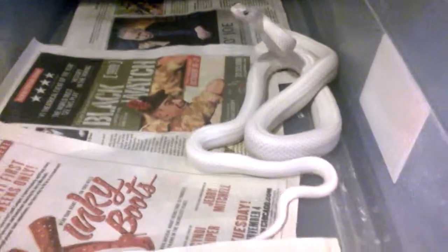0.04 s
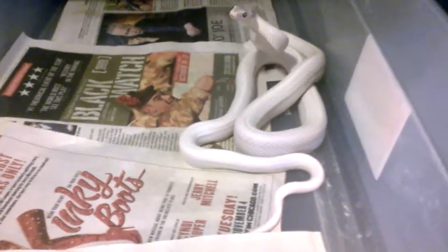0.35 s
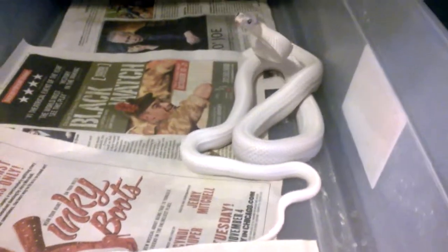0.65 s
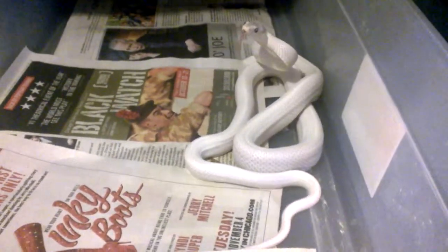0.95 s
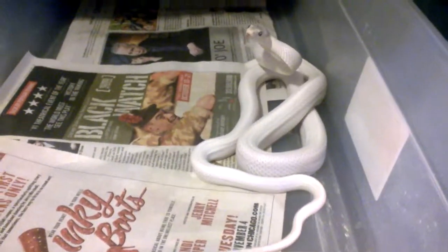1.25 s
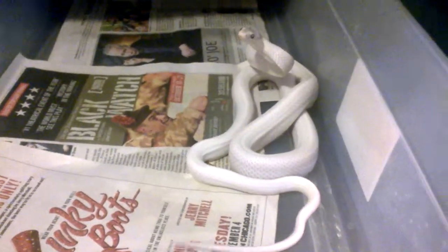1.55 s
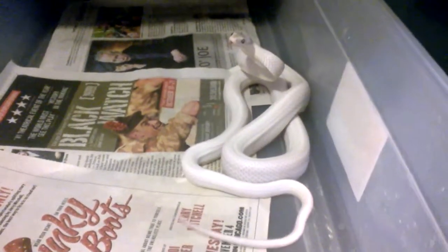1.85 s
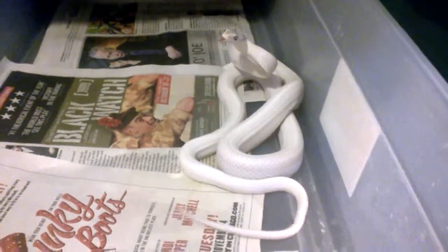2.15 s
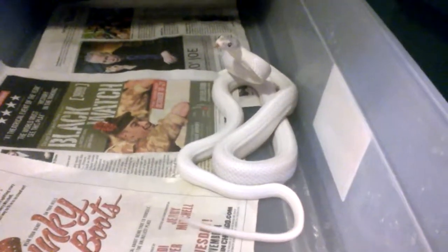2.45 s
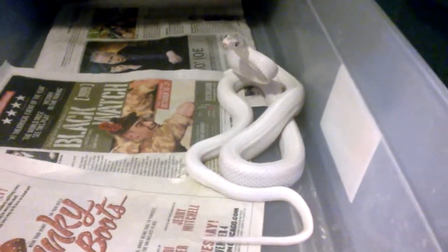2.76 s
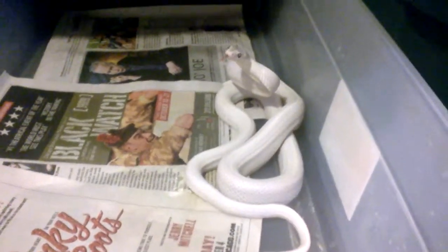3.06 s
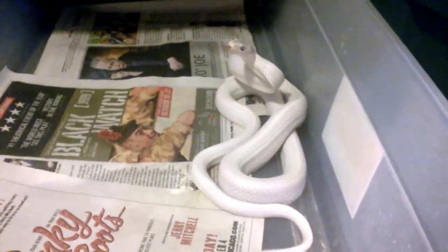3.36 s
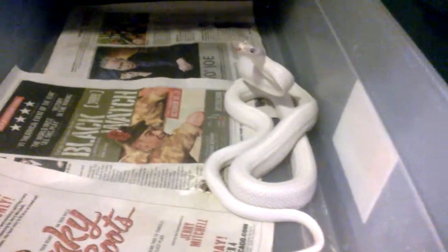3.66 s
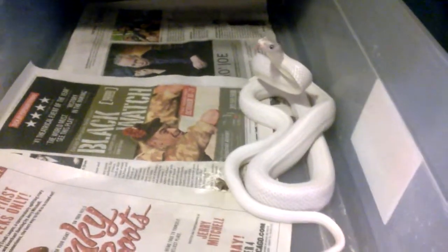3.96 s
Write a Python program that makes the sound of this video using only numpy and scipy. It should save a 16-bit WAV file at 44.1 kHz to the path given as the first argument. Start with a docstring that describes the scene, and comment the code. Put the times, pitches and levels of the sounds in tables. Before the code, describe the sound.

A snake's tail vibrates against newspaper in a plastic tub, making a continuous buzzing rustle.

```python
"""A plastic tub lined with newspaper, in a quiet room: a snake shakes its tail tip, some 44 swings a second.
Every swing scrapes the paper out and back in a spray of tiny ticks, and the rustle darkens as the tip
wanders over the sheet. The tub floor drums faintly under the tail, the body slides over the paper and
the shifting coils bump the tub. The room rumbles low behind it all."""
import sys
import numpy as np
from scipy import signal
from scipy.fft import rfft, irfft
from scipy.io import wavfile

SR = 44100
rng = np.random.default_rng(int(sys.argv[2]) if len(sys.argv) > 2 else 0)


def transcribe(u):
    """Save the signal u as a 16-bit wav file named by the first command-line argument.

    u: samples, shape (n,) or (channels, n), limited to [-1, 1]; the rate is SR.
    q: integer samples, one column per channel.
    """
    v = np.clip(np.atleast_2d(u).T, -1, 1)
    q = np.round(v * 32767).astype(np.int16)
    wavfile.write(sys.argv[1], SR, q)


N = 176400

# the out and back strokes of the tail, then the rebound of each: phase/swings, width/swings, level/dB
STROKES = [(.21, .075, 0), (.72, .095, -1.5), (.46, .03, -6.5), (.96, .035, -2.5)]


def amp(db):
    """Decibels to gain."""
    return 10 ** (np.asarray(db) / 20)


def unit(x):
    """Scales a signal to rms 1."""
    return x / np.sqrt(np.mean(x ** 2) + 1e-20)


def curve(points):
    """An automation curve through (time, value) points, one value a sample."""
    return np.interp(np.arange(N) / SR, *np.transpose(points))


def swell(peak_s, rise_s, fall_s):
    """A bell-shaped envelope with its own rise and fall times."""
    t = np.arange(N) / SR - peak_s
    return np.exp(-.5 * (t / np.where(t < 0, rise_s, fall_s)) ** 2)


def colour(x, points):
    """A minimum-phase EQ through (frequency, level) points; the result has rms 1."""
    hz, db = np.transpose(points)
    f = abs(np.fft.fftfreq(8192, 1 / SR))
    gain_db = np.interp(np.log(f + 1), np.log(hz + 1), db)
    log_gain = np.log(amp(np.maximum(gain_db, -100)))
    ring = np.fft.ifft(np.exp(np.conj(signal.hilbert(log_gain)))).real
    return unit(signal.oaconvolve(x, ring[:len(ring) // 2])[:N])


def tail_pressure(swings, drag_db=-9.5, spread_db=.5, jitter_swings=.022, slap_s=.001):
    """The tip presses on the paper: two uneven strokes a swing over a light drag, and the odd slap."""
    # hard slaps of the tip: t/s, level/dB against a plain stroke
    slaps = [(.304, -1), (.382, 0), (1.423, 5), (3.76, 1), (3.824, 1), (3.99, 1)]
    swing_index, power = swings.astype(int), amp(drag_db) ** 2
    for phase, width, db in STROKES:
        late, strength = rng.standard_normal((2, SR))[:, swing_index]
        away = (swings % 1 - phase - jitter_swings * late) / width
        power = power + amp(db + spread_db * strength) ** 2 * np.exp(-.5 * away ** 2)
    for at, db in slaps:
        power = power + amp(db) ** 2 * swell(at, slap_s, slap_s)
    return np.sqrt(power)


def friction(pressure, slip_s=.002, slip_db=2.5, shared=.02, ticks_per_s=1400, scrape_over_ticks_db=7.5):
    """Scales catch and slip on paper fibres: a scrape of brief spurts, band by band, and hard ticks."""
    # centres of the bands that slip almost independently: f/Hz
    bands = [2500, 4200, 5400, 6500, 8200, 11000, 14500]
    window = np.exp(-np.pi * (2 * np.arange(-200, 201) / (slip_s * SR)) ** 2)
    noises = rng.standard_normal((len(bands) + 1, N))
    common_slip, *band_slips = [unit(signal.oaconvolve(noise, window, "same")) for noise in noises]
    hz, scrape = np.fft.rfftfreq(N, 1 / SR), 0
    for own_slip, band in zip(band_slips, np.eye(len(bands))):
        hiss = irfft(rfft(rng.standard_normal(N)) * np.sqrt(np.interp(hz, bands, band)), N)
        slip = np.sqrt(shared) * common_slip + np.sqrt(1 - shared) * own_slip
        scrape = scrape + hiss * amp(slip_db * np.minimum(slip, 2))
    tick_size = amp(2 * np.minimum(rng.exponential(1, N), 3))  # spread over 6 dB
    ticks = tick_size * rng.choice([-1, 1], N) * (rng.random(N) < ticks_per_s / SR)
    return unit(pressure * (amp(scrape_over_ticks_db) * unit(scrape) + unit(ticks)))


def tub_walls(x, count=40, wet_db=-9.5, t60_s=.04, spot_s=.5):
    """Close reflections between the tub walls, crossfading as the tip moves from spot to spot."""
    spot, echoes = np.arange(N) / SR / spot_s, 0
    for k in range(int(spot[-1]) + 2):
        delay_s = rng.uniform(.0005, .03, count)
        taps = np.zeros(SR // 20)
        taps[(delay_s * SR).astype(int)] = rng.choice([-1, 1], count) * amp(-60 * delay_s / t60_s)
        near = np.sqrt(np.maximum(1 - abs(spot - k), 0))
        echoes = echoes + near * signal.oaconvolve(x, taps / np.linalg.norm(taps))[:N]
    return unit(x + amp(wet_db) * echoes)


def paper_rustle(scrape, place, trim_db=.52):
    """Friction rings the sheet, in a different tone at each place the tip touches."""
    # the paper's resonances at each place: f/Hz, level/dB
    edge = [(530, -71), (900, -30.5), (2550, -23.5), (2950, -13.5), (3750, -1), (5250, -2.5), (6100, -8),
            (6600, -3), (8100, -1), (9100, -4.5), (9870, -13), (12000, -10.5), (15600, -39)]
    along_edge = [(530, -66), (900, -35.5), (1710, -34), (2550, -26.5), (4020, -6.5), (5500, -4),
                  (6260, -11), (6680, -5), (8040, -1), (10400, -18.5), (12000, -21.5), (15600, -37)]
    middle = [(530, -63), (900, -41), (1840, -34), (3030, -22.5), (3340, -13), (4520, -3), (5560, -4.5),
              (6300, -0.5), (7060, -5), (8390, -6.5), (12000, -16.5), (15600, -55)]
    fold = [(530, -68), (900, -39), (1600, -40.5), (3450, -16), (4200, -.5), (6470, -4), (6980, -9),
            (7950, -7), (12000, -20.5), (15600, -53)]
    flap = [(530, -87), (900, -50), (1880, -33.5), (2350, -35), (4000, -3.5), (4400, 0.5), (5050, -8.5),
            (6400, -12), (7100, -18.5), (8210, -16), (12000, -24.5), (15600, -56)]
    # fader ride of the rustle, ahead of the trim: t/s, level/dB
    fader = [(0, -44), (1.56, -46.5), (1.59, -44.5), (3.21, -42), (3.56, -41), (3.86, -41), (4, -42)]
    rustle = 0
    for k, spectrum in enumerate([edge, along_edge, middle, fold, flap]):
        share = np.maximum(1 - abs(place - k), 0)
        rustle = rustle + share * colour(scrape, spectrum)
    return flap_lift(rustle) * amp(curve(fader) + trim_db)


def scale_fizz(pressure, place, trim_db=-1.5):
    """The scales add a fine fizz on top; its tone changes from the middle of the sheet to the fold."""
    # the fizz from edge to middle, and on fold and flap: f/Hz, level/dB
    sheet_eq = [(7000, -44.5), (9500, -12), (10600, -0.5), (12000, -1), (13500, 1), (15700, -2)]
    flap_eq = [(7000, -44), (9500, -3), (11500, -14), (13300, 3.5), (14600, -0.5), (15700, 2.5)]
    # fader ride of the fizz, ahead of the trim: t/s, level/dB
    fader = [(0, -45.5), (.3, -53), (.42, -48.5), (.75, -52.5), (.92, -60), (1.08, -54), (1.25, -69),
             (1.42, -55.5), (1.57, -57), (1.62, -52.5), (1.9, -48), (2.1, -51.5), (2.9, -50), (3.15, -47),
             (3.83, -47.5), (3.92, -52), (4, -55.5)]
    scrape = tub_walls(friction(pressure))
    blend = np.clip(place - 2, 0, 1)
    fizz = (1 - blend) * colour(scrape, sheet_eq) + blend * colour(scrape, flap_eq)
    return fizz * amp(curve(fader) + trim_db)


def tub_drumming(swings, return_db=-6, spread_db=2, scuff_db=-2):
    """Each stroke taps and scuffs the tub floor through the paper, the return stroke more softly."""
    # resonances of the tub floor: f/Hz, level/dB
    floor_eq = [(40, -1.5), (90, 0), (130, 0), (195, 2), (265, -7), (315, 0), (370, 2.5), (480, -5),
                (900, -13.5), (4000, -49)]
    # fader ride of the drumming: t/s, level/dB
    fader = [(0, -77.5), (.5, -68), (1.2, -74.5), (2.6, -81), (3, -73.5), (3.4, -77.5), (3.8, -77)]
    taps = np.zeros(N)
    for (phase, _, _), db in zip(STROKES, [0, return_db]):
        hits = np.flatnonzero(np.diff(np.floor(swings - phase)))
        taps[hits] += amp(db + spread_db * rng.standard_normal(SR)[:len(hits)])
    scuff = unit(tail_pressure(swings) * rng.standard_normal(N))
    return colour(unit(taps) + amp(scuff_db) * scuff, floor_eq) * amp(curve(fader))


def room_tone(level_db=-63.5, rumble_below_hz=150, lumps_db=1.9, lumps_hz=9):
    """A faint hiss over a rumble that comes in lumps."""
    # the room's noise floor: f/Hz, level/dB
    room_eq = [(20, -15), (42, 1), (60, -3.5), (85, -4.5), (130, -11), (250, -19), (500, -29), (1000, -31),
               (4000, -32)]
    bed = colour(rng.standard_normal(N), room_eq)
    rumble = signal.sosfiltfilt(signal.butter(2, rumble_below_hz, fs=SR, output="sos"), bed)
    hiss = bed - rumble
    smoothing = np.exp(-(np.fft.rfftfreq(N, 1 / SR) / lumps_hz) ** 2)
    lumps = unit(irfft(rfft(rng.standard_normal(N)) * smoothing, N))
    return amp(level_db) * (hiss + rumble * unit(amp(lumps_db * lumps)))


def body_slides(pressure, stop_s=.028):
    """The body slides over the paper: soft rubs that swell and stop short, shaken by the tail."""
    # the slides: peak t/s, rise/s, level/dB, f/Hz
    slides = [(.33, .14, -69, 353), (.7, 0.14, -63.5, 345), (1.66, 0.056, -71, 288),
              (2.91, 0.057, -69, 1730), (3.72, .07, -71.5, 345)]
    # tone of a rub: multiple of the slide's f, level/dB
    rub_eq = [(.2, -20), (.75, -4), (1.15, 1.5), (2.2, -14), (8, -52)]
    out = np.zeros(N)
    for peak_s, rise_s, db, hz in slides:
        rub = colour(pressure * rng.standard_normal(N), [(hz * k, level) for k, level in rub_eq])
        out += amp(db) * rub * swell(peak_s, rise_s, stop_s)
    return out


def coil_bumps(rise_s=.01, decay_s=.022, scuff_db=-3.5):
    """The coils knock softly against the tub: a short, dull ring with a scuff."""
    # the knocks: t/s, level/dB, f/Hz
    bumps = [(1.713, -57.5, 262), (1.735, -50.5, 88), (2.128, -55, 48), (3.94, -57, 55)]
    out = np.zeros(N)
    for start, db, hz in bumps:
        t = np.maximum(np.arange(N) / SR - start, 0)
        scuff_eq = [(hz / 4, -25), (hz / 1.4, 0), (hz * 1.6, -1), (hz * 2.5, -22), (hz * 10, -70)]
        thud = np.sin(2 * np.pi * hz * t) + amp(scuff_db) * colour(rng.standard_normal(N), scuff_eq)
        envelope = np.minimum(t / rise_s, 1) * np.exp(-np.maximum(t - rise_s, 0) / decay_s)
        out += amp(db) * thud * envelope
    return out


def flap_lift(rustle):
    """The ring of the sheet rises a touch, then sinks, as the flap lifts."""
    # frequency shift of the rustle: t/s, shift/Hz
    shift = [(3.3, 0), (3.8, 10), (3.95, -190)]
    cycles = np.cumsum(curve(shift)) / SR
    return (signal.hilbert(rustle) * np.exp(2j * np.pi * cycles)).real


def flap_ring(scrape):
    """A lower resonance of the loose flap swells in at the end."""
    # the resonance: peak t/s, width/s, level/dB, f/Hz
    resonance = (4, .28, -62.5, 2954)
    peak_s, width_s, db, hz = resonance
    ring = colour(scrape, [(hz / 1.25, -35), (hz, 0), (hz * 1.4, -35)])
    return amp(db) * ring * swell(peak_s, width_s, width_s)


def scene():
    """One shaking tail drives paper and tub, mixed in mono with the body's moves and the room."""
    # pace of the tail's swings: t/s, f/Hz
    swing_rate = [(0, 45.2), (.65, 44.9), (.9, 44.1), (1.5, 44.9), (1.9, 43.5), (2.5, 42.5), (3.3, 42.9),
                  (4, 40.9)]
    # path of the tip: t/s, place (0 edge of the sheet, 1 along the edge, 2 middle, 3 fold, 4 loose flap)
    tip_path = [(.65, 0), (.9, 0.5), (1.52, 1), (1.82, 2), (2.42, 2), (2.58, 3), (2.95, 3.5), (3.15, 3.5),
                (3.8, 4)]
    swings = np.cumsum(curve(swing_rate)) / SR
    place = curve(tip_path)
    pressure = tail_pressure(swings)
    scrape = tub_walls(friction(pressure))
    paper = paper_rustle(scrape, place) + scale_fizz(pressure, place) + flap_ring(scrape)
    return (paper + tub_drumming(swings) + body_slides(pressure) + coil_bumps() + room_tone())[None]


def record(dry, cutoff_hz=15780):
    """A steep low-pass takes off the very top."""
    low_pass = signal.firwin(801, cutoff_hz, window=("kaiser", 8), fs=SR)
    return signal.oaconvolve(dry, low_pass[None], "same")


dry = scene()
out = record(dry)
transcribe(out)
```